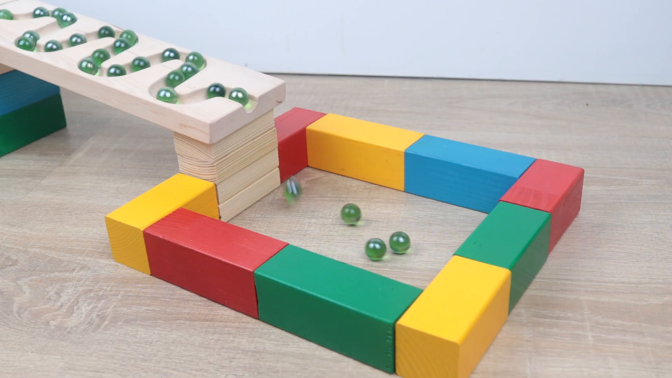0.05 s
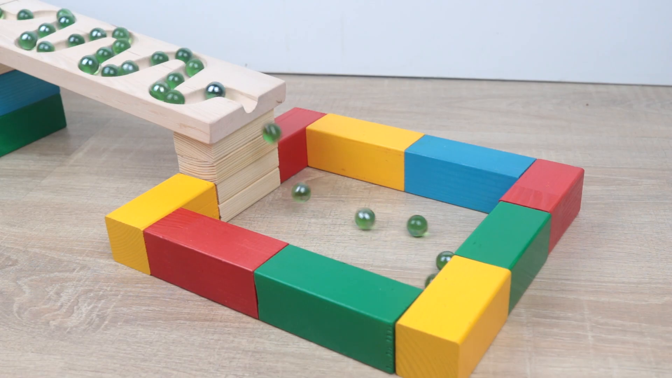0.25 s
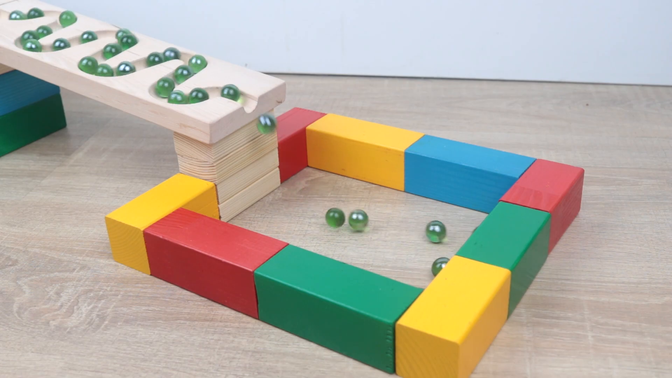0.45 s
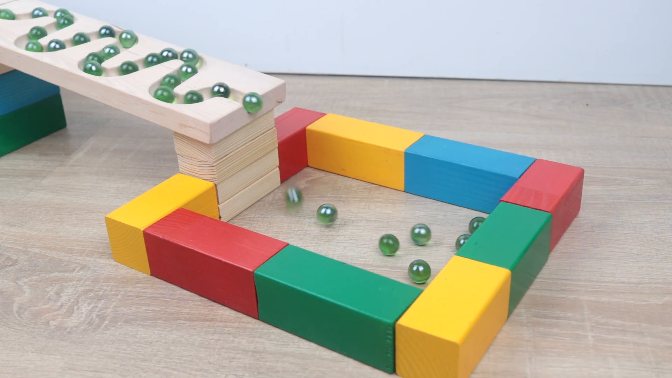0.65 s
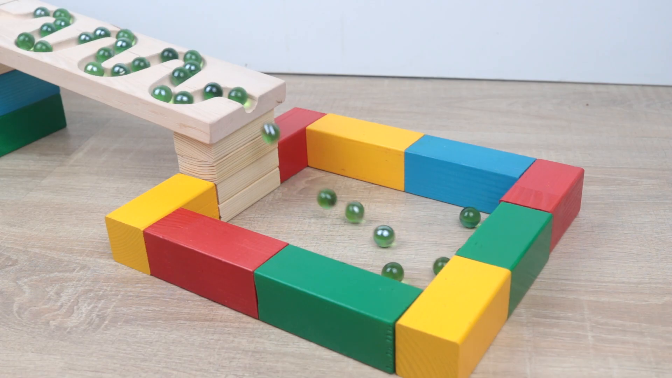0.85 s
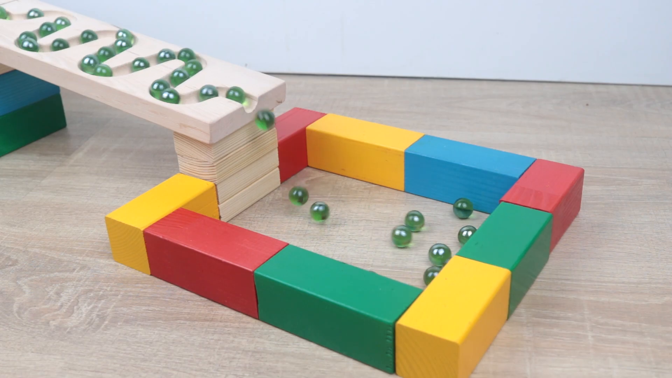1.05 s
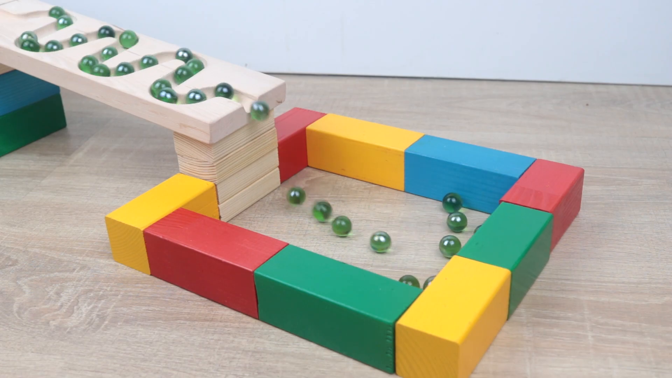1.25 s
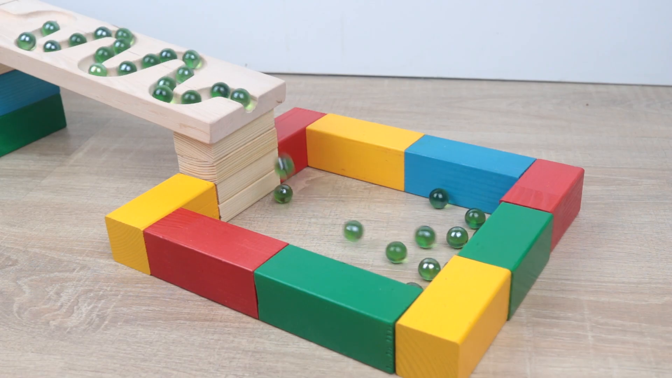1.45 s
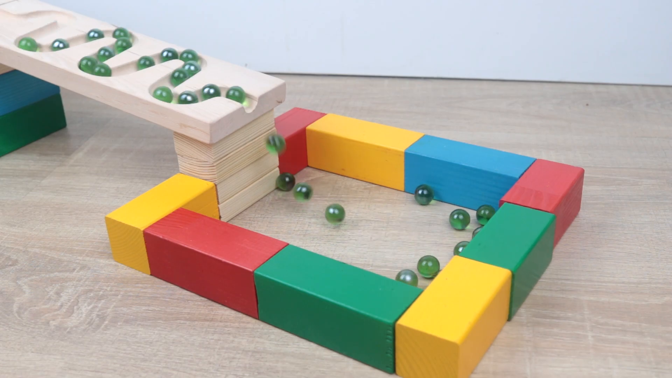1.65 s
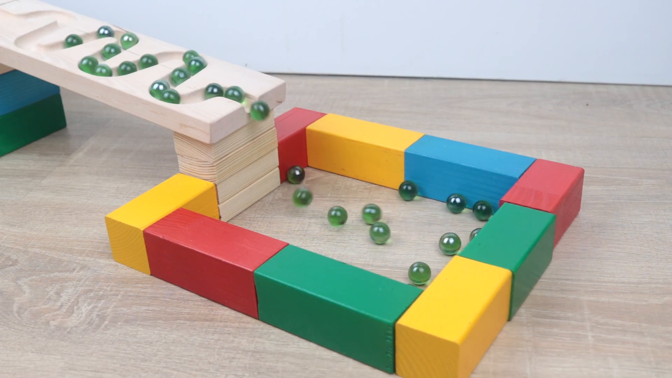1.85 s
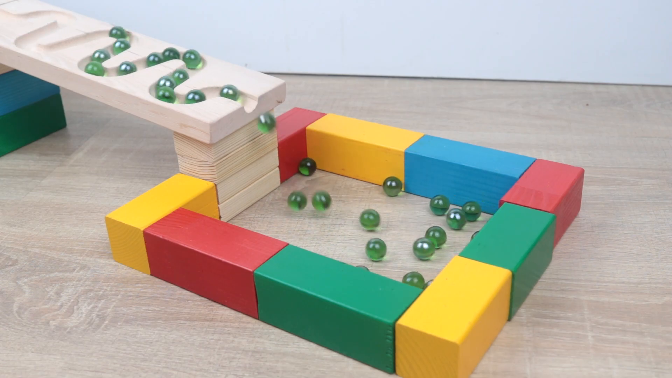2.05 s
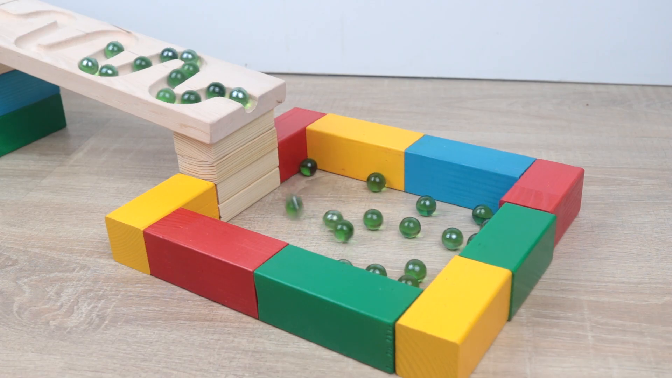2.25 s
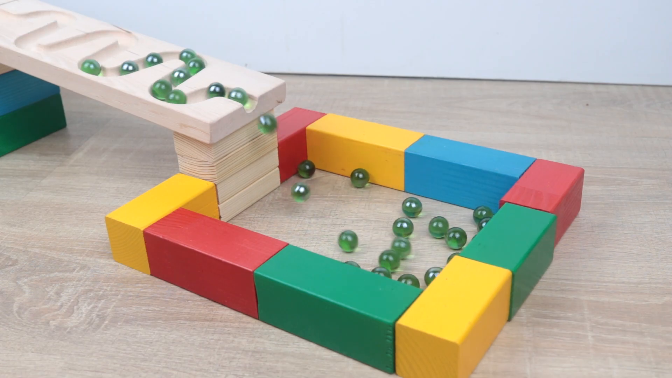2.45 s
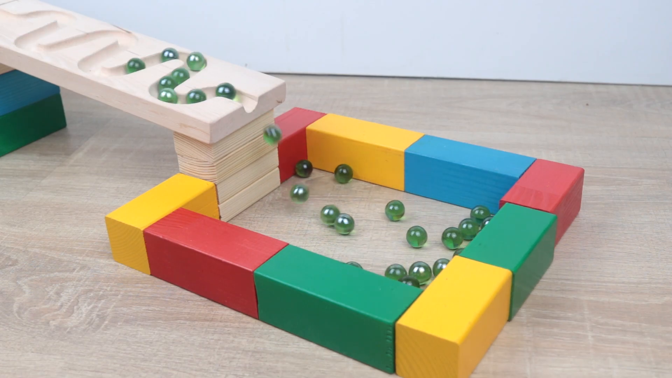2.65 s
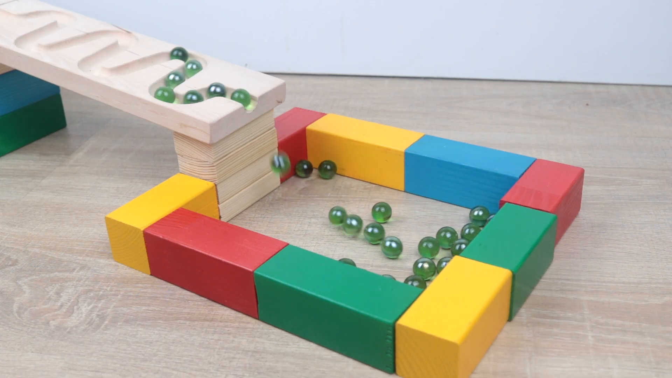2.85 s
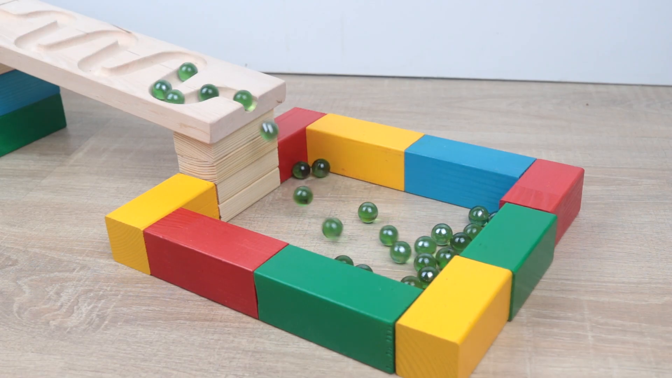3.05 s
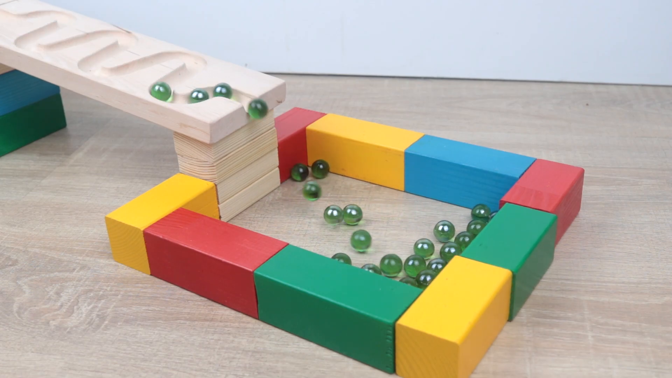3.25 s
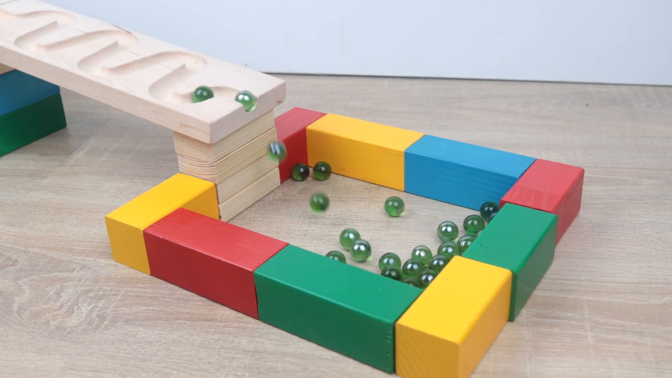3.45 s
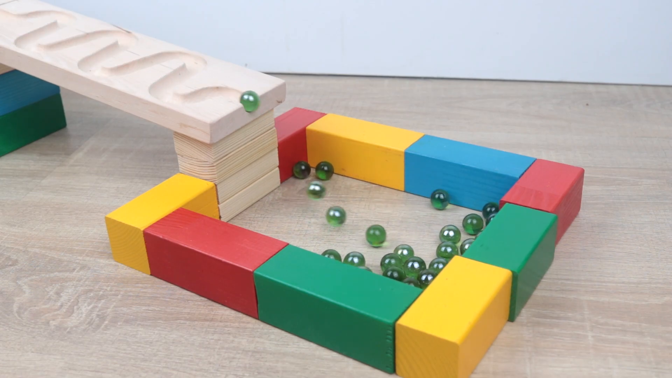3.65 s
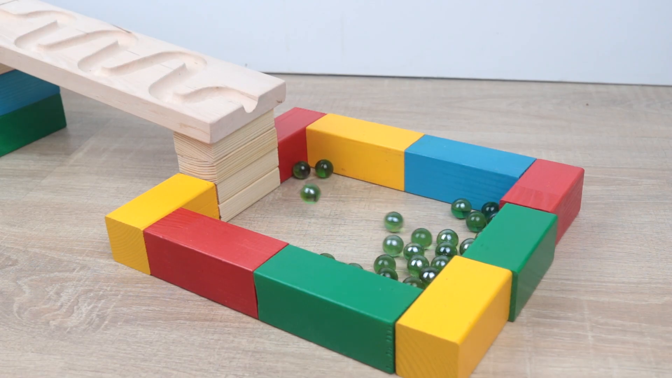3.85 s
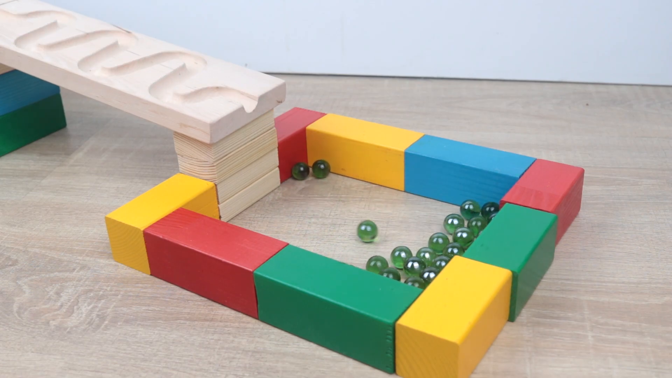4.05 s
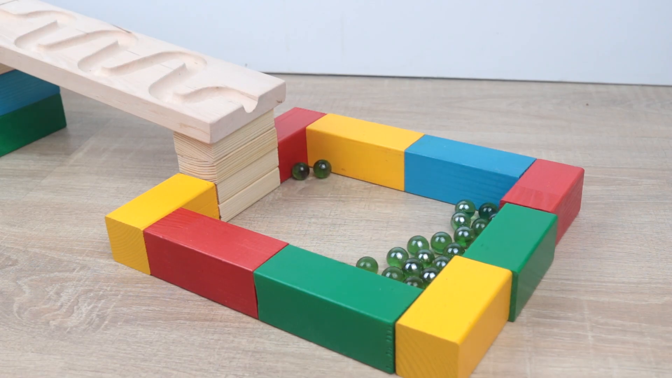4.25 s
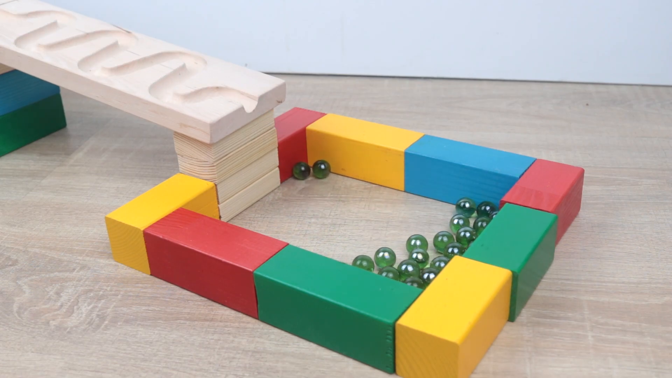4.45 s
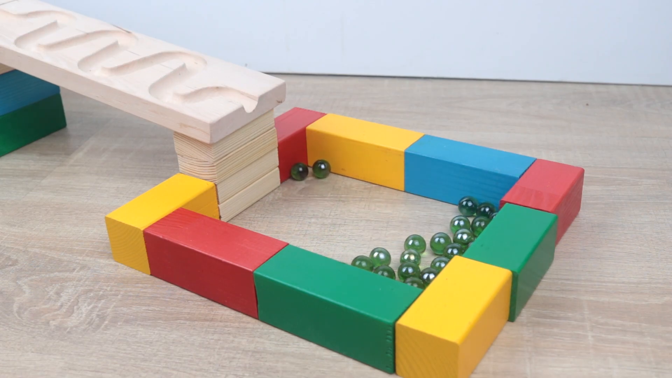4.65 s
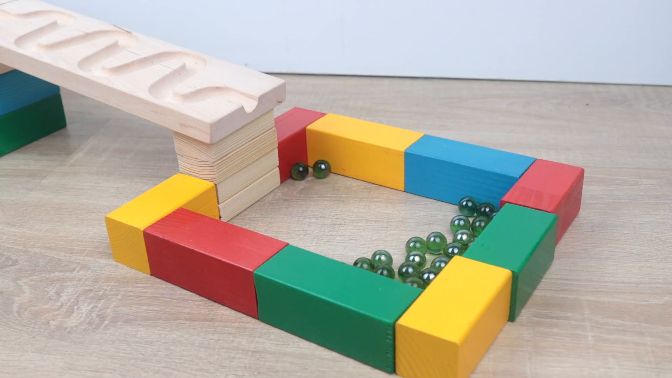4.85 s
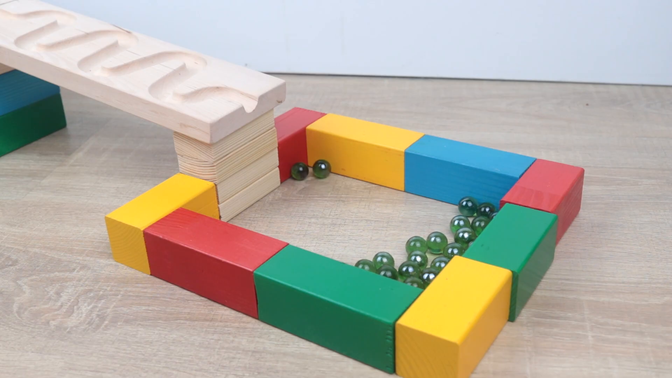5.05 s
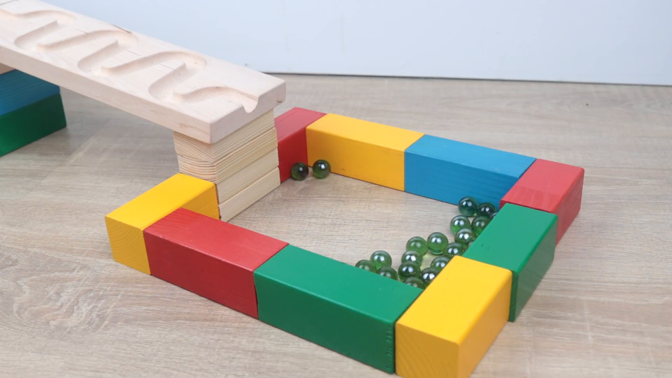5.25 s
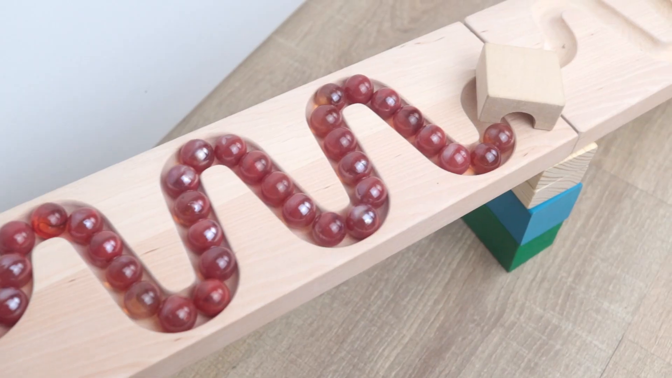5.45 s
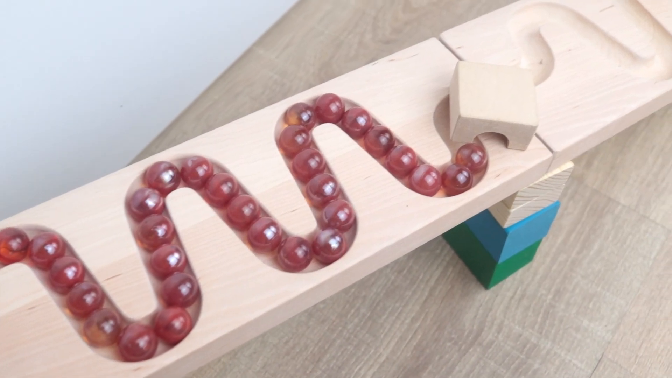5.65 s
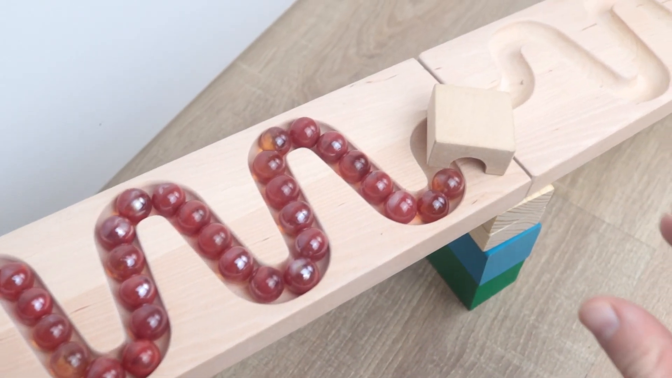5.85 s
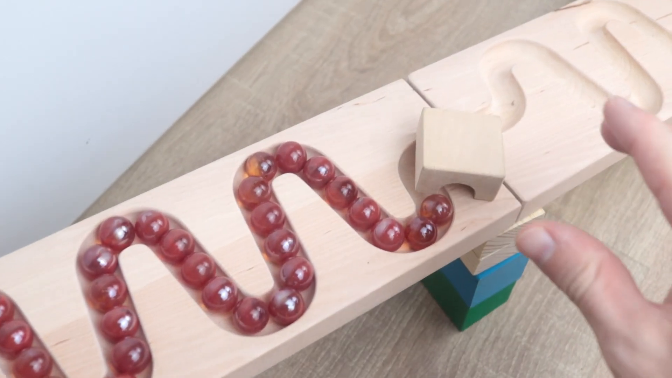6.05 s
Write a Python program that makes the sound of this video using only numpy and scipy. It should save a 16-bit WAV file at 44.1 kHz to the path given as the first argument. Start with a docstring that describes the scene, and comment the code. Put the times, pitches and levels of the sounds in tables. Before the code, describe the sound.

From the start, glass marbles roll down a winding wooden track with a soft, ticking murmur and drop one by one onto a laminate floor close to the microphone. About eight or nine land each second, each with a hard clack followed by quicker, softer bounces, making a dense clatter. The loudest clacks overload the microphone slightly. The last one lands at about 3.9 seconds, and the rolling is gone by 4.4. From 4.1 to 4.4 seconds that marble chatters across the floor in ever faster hops and runs into the heap. Sharp little glass clicks and small knocks against the surrounding wooden blocks grow fainter and sparser until about 5.3 seconds. The room's quiet low rumble and hiss remain, with a faint swish at 5.4 seconds and a few soft, dull bumps around 6 seconds as a hand comes near.

```python
"""A room with a laminate floor, the microphone close to a pen of wooden blocks. Glass marbles murmur
down a winding wooden track and drop in one by one. Each rings the floor with a hard clack and bounces on;
the loudest clacks overload the microphone. The last marble chatters across the floor into the heap behind
the blocks, which clicks and settles. Then the room's low rumble and hiss remain, with a soft swish and a
few dull bumps as a hand comes near."""
import sys
import numpy as np
from scipy import signal
from scipy.fft import rfft, irfft, next_fast_len
from scipy.io import wavfile
from scipy.ndimage import map_coordinates

SR = 44100
rng = np.random.default_rng(int(sys.argv[2]) if len(sys.argv) > 2 else 0)


def dump_mix(stems):
    """Bounce the given channels to the path in sys.argv[1] as a 16-bit WAV at rate SR."""
    frames = np.atleast_2d(stems).T  # one column per channel
    limited = np.clip(frames, -1, 1)  # hard clip at full scale
    pcm = np.round(limited * 32767).astype(np.int16)
    wavfile.write(sys.argv[1], SR, pcm)


N = 269010
TIME = np.arange(N) / SR


def from_db(db):
    return 10 ** (np.asarray(db) / 20)


def rms_one(x):
    return x / np.sqrt(np.mean(x ** 2) + 1e-20)


def unit_energy(x):
    return x / np.sqrt(np.sum(x ** 2, axis=-1, keepdims=True))


def in_time(rows):
    """A curve of (time_s, level_db) rows, read at every sample."""
    return np.interp(TIME, *np.transpose(rows))


def at_hz(points, hz):
    """A spectrum read on a log-frequency axis."""
    freqs_hz, values = np.transpose(points)
    return np.interp(np.log(hz + 1), np.log(freqs_hz), values)


def cut(x, hz, kind, order=2):
    """Butterworth low- or high-pass."""
    return signal.sosfilt(signal.butter(order, hz, kind, fs=SR, output="sos"), x + 1e-18)


def pan(x, left_db):
    """Set the left channel left_db above the right."""
    return x * from_db([[left_db / 2], [-left_db / 2]])


def through(x, response):
    """Play a signal through an impulse response."""
    return signal.fftconvolve(np.atleast_2d(x), np.atleast_2d(response), axes=-1)[:, :N]


def body(modes, size=4096):
    """Impulse response of parallel resonances, signs alternating."""
    impulse = signal.unit_impulse(size) + 1e-18
    out = 0
    for k, (hz, width, db) in enumerate(modes):
        r = np.exp(-np.pi * width / SR)
        poles = [1, -2 * r * np.cos(2 * np.pi * hz / SR), r * r]
        out = out + (-1) ** k * from_db(db) * (1 - r * r) * signal.lfilter([1, 0, -1], poles, impulse)
    return unit_energy(out)


def varied(modes, detune, spread_db):
    """The same modes met at another spot: pitches and strengths shift a little."""
    shifts, gains = rng.standard_normal((2, len(modes)))
    return [(hz * np.exp(detune * shift), width, db + spread_db * gain)
            for (hz, width, db), shift, gain in zip(modes, shifts, gains)]


def colour(spectrum, size=4096):
    """The shortest causal impulse response that has this spectrum."""
    magnitude = from_db(at_hz(spectrum, np.fft.rfftfreq(size, 1 / SR)))
    cepstrum = irfft(np.log(magnitude))
    cepstrum[1:size // 2] *= 2
    cepstrum[size // 2 + 1:] = 0
    return unit_energy(irfft(np.exp(rfft(cepstrum))))


def grains(per_s, spread_db):
    """Two unrelated streams of tiny contacts of uneven size."""
    sizes = from_db(spread_db * np.clip(rng.standard_normal((2, N)), -2, 2))
    signs = rng.choice([-1, 1], (2, N))
    return rms_one(sizes * signs * (rng.random((2, N)) < per_s / SR))


def blows(rows, response):
    """Every (start_s, level_db) row sounds one call of the stereo response."""
    out = np.zeros((2, N))
    for s, db in rows:
        start = int(np.clip(round(s * SR), 0, N - 1))
        sound = response()
        out[:, start:start + sound.shape[1]] += from_db(db) * sound[:, :N - start]
    return out


def dying(rows, t60_s):
    """An envelope that jumps up at every (start_s, level_db) row and dies away."""
    return sum((TIME >= s) * from_db(db - 60 * np.clip((TIME - s) / t60_s, 0, 2)) for s, db in rows)


def swells(rows):
    """Smooth humps of level from (centre_s, width_s, level_db) rows."""
    return sum(from_db(db) * np.exp(-((TIME - s) / width) ** 2 / 2) for s, width, db in rows)


# how alike the two sides of the microphone hear the room: frequency_hz, correlation
STEREO_LIKENESS = [(60, 1), (300, 0.8192), (600, 0.95), (1300, 0.6), (3000, 0.24333), (12000, 0.4)]
def widen(pair):
    """Two unrelated signals become left and right: alike in the bass, apart in the treble."""
    size = pair.shape[1]
    padded = next_fast_len(size, True)
    mid, side = rfft(pair, padded)
    alike = at_hz(STEREO_LIKENESS, np.fft.rfftfreq(padded, 1 / SR))
    spectra = np.sqrt((1 + alike) / 2) * mid + np.sqrt((1 - alike) / 2) * side * [[1], [-1]]
    return irfft(spectra, padded)[:, :size]


def noise(spectrum):
    """Coloured stereo noise, rms 1."""
    return rms_one(through(widen(rng.standard_normal((2, N))), colour(spectrum)))


def scatter(t60_s, delay_s=0):
    """Dense reflections that set in after a delay and die away."""
    t = TIME[:SR // 2 if t60_s > .1 else 3072]
    return unit_energy(widen(rng.standard_normal((2, len(t)))) * from_db(-60 * t / t60_s) * (t > delay_s))


# the room's rumble and hiss, and the tone of a dull bump: frequency_hz, density_db
RUMBLE_SPECTRUM = [(15, -54.5), (25, -29), (66, -9), (125, -17), (253, -21.5), (327, -26), (368, -24.5),
                   (468, -26.5), (718, -26.5), (1500, -32.5), (1950, -78), (3300, -120)]
HISS_SPECTRUM = [(530, -59.5), (900, -22), (1770, -8.5), (2070, -8), (2150, -9.5), (3140, -6), (3500, -7),
                 (6580, -10.5), (7680, -13.5), (15500, -21)]
BUMP_SPECTRUM = [(30, -24), (80, -4), (120, 2), (170, -1), (280, -7), (500, -10), (800, -27), (2500, -52)]
# rise and fall of the rumble and the hiss: time_s, level_db
RUMBLE_CURVE = [(4.0, -73), (4.3, -52.5), (6.1, -53)]
HISS_CURVE = [(4.5, -57.5), (5.3, -62.5), (5.58, -55.5)]
# a hand coming near: centre_s, width_s, level_db
HAND_SWISH = [(5.41, 0.022, -53)]
HAND_BUMPS = [(6.03, 0.016, -43), (6.073, 0.014, -40.5), (6.098, 0.0063, -38)]
def room_tone():
    """All around, low rumble and faint hiss; a hand comes near with a swish and a few dull bumps."""
    rumble = from_db(in_time(RUMBLE_CURVE)) * noise(RUMBLE_SPECTRUM)
    hiss = (from_db(in_time(HISS_CURVE)) + swells(HAND_SWISH)) * noise(HISS_SPECTRUM)
    return rumble + hiss + swells(HAND_BUMPS) * noise(BUMP_SPECTRUM)


# marbles rolling in the groove: time_s, relative_level_db
ROLL_CURVE = [(0.0, -27.5), (0.95, -29), (1.26, -31), (1.59, -26), (2.16, -30.5), (3.54, -28.5),
              (3.92, -29.5), (4.1, -28)]
# tone of the wooden track: frequency_hz, density_db
TRACK_SPECTRUM = [(88, -52), (150, -25), (278, -38.5), (486, 1), (556, -9), (1200, -1), (2020, -4),
                  (2650, 0), (3820, -7.5), (4290, -5), (4810, -3), (5510, -10), (6680, -15.5),
                  (11500, -30.5), (15000, -32.5)]
# ringing of the track board: pitch_hz, width_hz, level_db
BOARD_MODES = [(506.6, 41, 1), (755, 93, -8), (888, 65, -1.5), (1067, 27, -4), (1438, 31, -7),
               (2680, 23, -3), (3433, 47, 1.5), (4050, 70, -0.5)]
def rolling(level_db=-3.0, ring_db=-5, tick_db=-6):
    """Up on the track, marbles murmur over the grain, tick against the bends and set the board ringing."""
    on_track = np.interp(TIME, [4.1, 4.36], [1, 0])
    envelope = on_track * from_db(in_time(ROLL_CURVE) + level_db)
    grain = grains(per_s=9000, spread_db=3)
    ticks = through(grains(per_s=210, spread_db=24.5), scatter(t60_s=0.014))
    contacts = widen(grain + from_db(tick_db) * ticks)
    wood = through(contacts, colour(TRACK_SPECTRUM))
    ring = through(widen(rng.standard_normal((2, N))), body(BOARD_MODES))
    return pan(envelope * (rms_one(wood) + from_db(ring_db) * rms_one(ring)), left_db=-0.9)


# marbles nudging the blocks: start_s, relative_level_db
BLOCK_KNOCKS = [(4.542, -21), (4.625, -23.5), (4.679, -26.5), (4.727, -21.5), (4.775, -44), (4.929, -17),
                (4.983, -39), (5.075, -30), (5.286, -34)]
# ringing of a wooden block: pitch_hz, width_hz, level_db
BLOCK_MODES = [(480, 120, -1), (930, 210, 2.5), (1580, 200, -0.5), (2080, 640, 0), (2300, 270, -1)]
def block_knocks(level_db=8):
    """The heap nudges the pen, and the blocks answer with small woody knocks."""
    def knock():
        wood = body(varied(BLOCK_MODES, detune=0.043, spread_db=-1.5))
        return through(wood, scatter(t60_s=0.057))
    return from_db(level_db) * cut(blows(BLOCK_KNOCKS, knock), 5400, "low")


# the open floor between the blocks, under rocking and hopping marbles: pitch_hz, width_hz, level_db
OPEN_FLOOR_MODES = [(500, 260, 3.5), (920, 350, -1.5), (1160, 200, -2), (1520, 260, -2), (1960, 310, -1.5),
                    (2393, 290, 0), (2920, 550, 5), (3570, 250, -1), (4720, 500, -9)]
def rocking(level_db=-26, t60_s=.42):
    """After each knock the settling marbles rock on the floor for a while: faint dry ticks."""
    ticks = widen(grains(per_s=300, spread_db=2))
    return through(from_db(level_db) * dying(BLOCK_KNOCKS, t60_s) * ticks, body(OPEN_FLOOR_MODES))


def last_marble(start_s=4.11, heap_s=4.358, level_db=-25.5, swell_db_per_s=6.5, fade_db_per_s=290,
                first_hops_per_s=95, most_hops_per_s=520, doubling_s=0.093, jitter=.2, uneven_db=5.5):
    """Ever quicker hops across the open floor blur into a buzz that swells, then dies in the heap."""
    crossing_s = np.clip(TIME, start_s, heap_s) - start_s
    in_heap_s = np.maximum(TIME - heap_s, 0)
    db = level_db + swell_db_per_s * crossing_s - fade_db_per_s * in_heap_s
    per_s = np.minimum(first_hops_per_s * 2 ** (crossing_s / doubling_s), most_hops_per_s)
    unsteady = np.interp(TIME, np.linspace(0, TIME[-1], 1200), rng.standard_normal(1200))
    hop_count = np.floor(np.cumsum(per_s * np.exp(jitter * unsteady) * (crossing_s > 0)) / SR)
    at = np.flatnonzero(np.diff(hop_count, prepend=0) * (db > -60))
    # quicker hops each carry less energy
    hop_db = db + 10 * np.log10(SR / per_s) + uneven_db * rng.uniform(-1.2, 1, N)
    hop = through(body(OPEN_FLOOR_MODES, size=2048), scatter(t60_s=0.013))
    buzz = blows(zip(TIME[at], hop_db[at]), lambda: hop)
    return pan(cut(cut(buzz, 6800, "low"), 350, "high"), left_db=-2.0)


# glass against glass in the heap: start_s, relative_level_db
HEAP_CLICKS = [(4.148, -10.5), (4.2373, -10), (4.2912, -4), (4.333, -5), (4.349, -7), (4.38, -5.5),
               (4.439, -13), (4.5225, -18.5), (4.575, -21), (4.5997, -19), (4.6242, -14.5), (4.6603, -15.5),
               (4.6886, -20.5), (4.728, -18), (4.768, -23.5), (4.8565, -31), (4.953, -16.5), (5.233, -26)]
# tone of a glass click: frequency_hz, density_db
GLASS_SPECTRUM = [(1500, -20), (3500, -4), (5300, 2.5), (7000, 2), (8800, 1.5), (10300, -0.5),
                  (11500, -9.5), (15500, -13.5)]
def heap_clicks(level_db=2, jostle_db=-10.5, jostle_db_per_db=1.9):
    """Glass meets glass, no two clicks alike; a hard one jostles its neighbours far more than a soft one."""
    def click():
        spectrum = [(hz, db + 4 * rng.standard_normal()) for hz, db in GLASS_SPECTRUM]
        return through(colour(spectrum), scatter(t60_s=0.025))
    shoves = [(s, jostle_db + jostle_db_per_db * db) for s, db in HEAP_CLICKS]
    jostle = dying(shoves, t60_s=0.055) * grains(per_s=800, spread_db=3)
    clicks = from_db(level_db) * blows(HEAP_CLICKS, click)
    return pan(clicks + through(jostle, colour(GLASS_SPECTRUM)), left_db=-1.0)


# reflections off the track's tower and the blocks: left_delay_s, right_delay_s, left_gain, right_gain
NEAR_ECHOES = [(.00066, 0.000748, 0.0747, 0.051), (.00154, 0.00152, 0.23, 0.36),
               (.00198, 0.0022, 0.41, .12), (.0033, 0.0029, 0.45, 0.13)]
def block_echoes(size, wander=0.038, lowest_hz=1400):
    """Echoes whose delays shift with each bounce; the blocks are too small to reflect the bass."""
    stretch = np.exp(wander * rng.standard_normal())
    echoes = sum(np.sinc(np.arange(size) - SR * stretch * np.array([[left_s], [right_s]]))
                 * [[left], [right]] for left_s, right_s, left, right in NEAR_ECHOES)
    pole = np.exp(-2 * np.pi * lowest_hz / SR)
    return signal.lfilter([1, -1], [1, -pole], echoes)


def shaded(modes, side, shade_db=-2, above_hz=3600, narrowest_hz=420):
    """Treble modes at one side of the microphone: all well damped, the highest weaker on the left (0)."""
    return [(hz, max(width, narrowest_hz), db + shade_db * (side == 0) * (hz > above_hz))
            for hz, width, db in modes]


# the laminate under a falling marble: pitch_hz, width_hz, level_db
LAMINATE_MODES = [(528, 202, 0), (969, 283, 2.5), (1231.5, 830, -3), (2030, 266.46, -3.5), (2980, 1490, -2),
                  (4104, 720, 3.5), (4730, 214, 2.5), (7400, 3200, -11), (8730, 540, -7),
                  (14000, 1600, -14.5)]
def clack(scatter_db=-13):
    """One contact: the floor's ring reaches the microphone directly, as scatter and as close echoes."""
    modes = varied(LAMINATE_MODES, detune=0.031, spread_db=1.13)
    ring = []
    for side in range(2):
        treble = varied(shaded(modes[2:], side), detune=0.014, spread_db=1.5)
        ring.append(body(modes[:2] + treble, size=768))
    paths = from_db(scatter_db) * scatter(t60_s=0.082, delay_s=0.003)
    paths[:, 0] += 1   # the direct sound
    return through(ring, unit_energy(paths + block_echoes(paths.shape[1])))


# each marble lands, rebounds, then bounces out (levels relative):
# start_s, landing_db, first_flight_s, rebound_db, restitution, next_bounce_db
MARBLE_DROPS = [(.0505, -11, .071, -20, .6, -24), (.0915, -4, .059, -8.5, .6, -19),
                (.1721, -1, .1206, 0, .601, -15), (.3309, -.5, .126, -9, .559, -12),
                (.4224, -.5, .1232, -8.5, .655, -8), (.6338, -3.5, .1191, -1.5, .526, -16),
                (.7681, -6, .1305, -13, .536, -12.5), (.8789, 1, .1174, -6.5, .513, -19),
                (1.0227, -5.5, .1253, -10.5, .563, -13.5), (1.1346, 0, .1193, -12, .553, -13.5),
                (1.2401, -3.5, .1245, -12.5, .458, -15), (1.3419, -4, .1025, -3, .517, -16),
                (1.5365, -5, .1219, -16.5, .557, -16), (1.5916, 1.5, .1227, -.5, .542, -14),
                (1.7263, -5.5, .117, -11.5, .538, -19), (1.8122, -3, .1225, -5, .519, -16),
                (1.9417, -6, .1249, -10, .556, -10.5), (2.0568, -.5, .1216, -13, .51, -17),
                (2.1467, -2, .1258, -12, .583, -12), (2.2373, -3, .1223, -7.5, .569, -15.5),
                (2.3664, -7.5, .124, -4.5, .605, -13), (2.5289, -1, .1269, -10, .545, -12.5),
                (2.6355, -1.5, .1248, -12.5, .504, -15), (2.7368, -5, .1273, -9.5, .509, -12.5),
                (2.8232, -5, .1301, -8, .525, -17), (2.9961, -2, .1167, -3.5, .562, -15),
                (3.126, -3.5, .1144, -9, .555, -12.5), (3.2288, -2.5, .1169, -10.5, .618, -11.5),
                (3.3141, -4, .1245, -7.5, .523, -16), (3.4631, -4, .1257, -1.5, .574, -13.5),
                (3.6069, -3.5, .1249, -12, .531, -15), (3.7067, .5, .1182, -5, .505, -18.5),
                (3.8934, 1, .1201, -.5, .525, -8.5)]
def bounces(count=4, loss_db=6.5, gentle_restitution=.75, gentle_share=.22):
    """Every floor contact as (start_s, level_db): flights shorten and the late bounces grow softer."""
    for s, landing_db, flight_s, rebound_db, restitution, bounce_db in MARBLE_DROPS:
        yield s, landing_db
        s += flight_s
        yield s, rebound_db
        for k in range(count):
            flight_s *= restitution
            s += flight_s
            yield s, bounce_db - k * loss_db
            restitution += gentle_share * (gentle_restitution - restitution)   # slow bounces lose less


def landings(level_db=20.5, left_top_hz=6200, right_top_hz=8600, low_cut_hz=335, right_lag_s=.00003):
    """All marbles land near one spot by the microphone: a little duller left, a moment later right."""
    left, right = cut(blows(bounces(), clack), low_cut_hz, "high", order=3)
    left, right = cut(left, left_top_hz, "low"), cut(right, right_top_hz, "low")
    right = map_coordinates(right, [np.arange(N) - right_lag_s * SR], order=3)
    return from_db(level_db) * pan(np.array([left, right]), left_db=-0.5)


def scene(landing_wet_db=-17, heap_wet_db=-10):
    """The landings face the microphone; the heap, behind the blocks, is heard more by way of the room."""
    walls = scatter(t60_s=0.15, delay_s=0.0054)
    background = rolling() + room_tone()
    near = landings()
    hidden = rocking() + heap_clicks() + block_knocks() + last_marble()
    room = through(from_db(landing_wet_db) * near + from_db(heap_wet_db) * hidden, walls)
    return background + cut(room, 19000, "low", order=1) + hidden + near


def record(dry, ceiling=.97, thud_db=-16, thud_hz=150, top_hz=16000):
    """The loudest clacks clip flat and the overload kicks the microphone into a thud; the top is cut."""
    clipped = np.clip(dry, -ceiling, ceiling)
    overload = np.abs(dry - clipped)
    thud = pan(from_db(thud_db) * cut(overload, thud_hz, "low"), left_db=-13.5)
    return signal.sosfilt(signal.ellip(8, .2, 70, top_hz, fs=SR, output="sos"), clipped + thud)


dry = scene()
out = record(dry)
dump_mix(out)
```